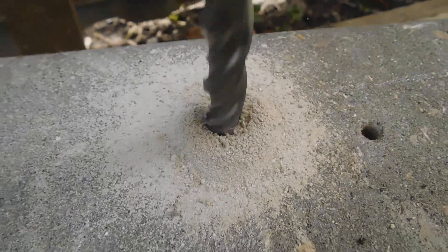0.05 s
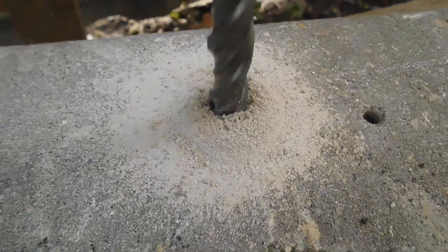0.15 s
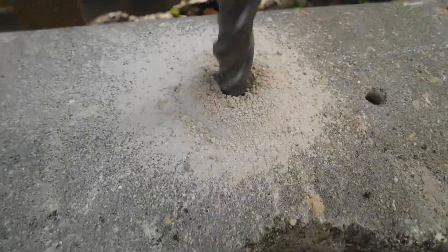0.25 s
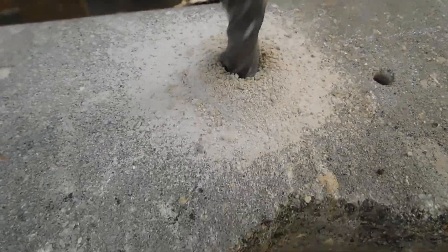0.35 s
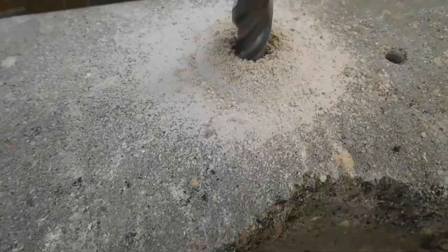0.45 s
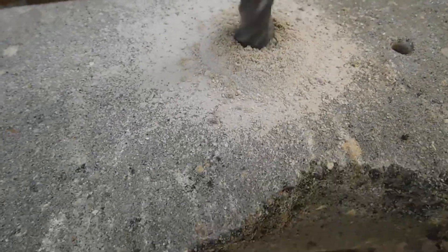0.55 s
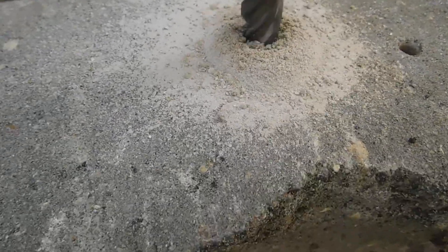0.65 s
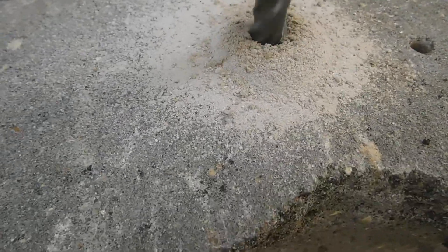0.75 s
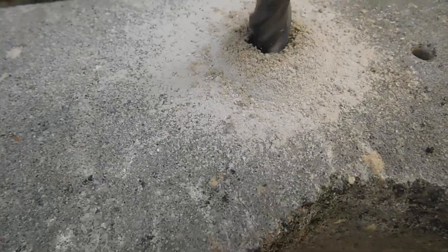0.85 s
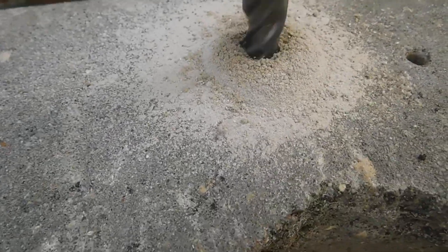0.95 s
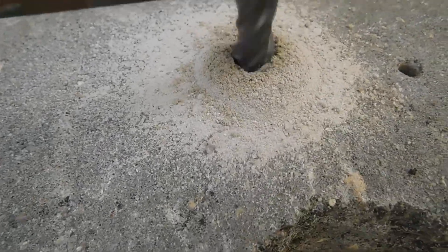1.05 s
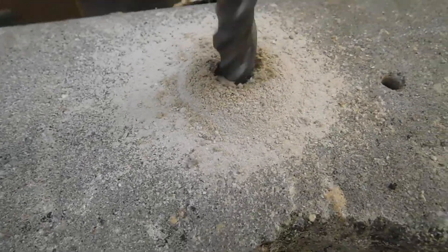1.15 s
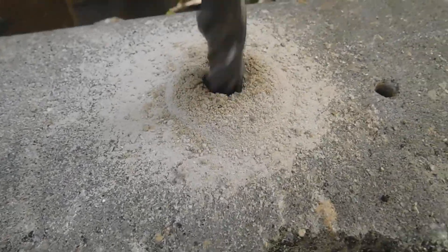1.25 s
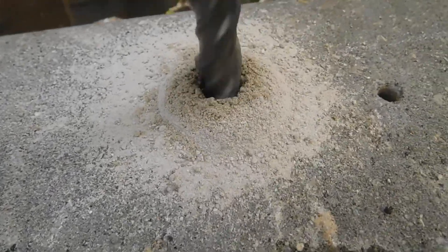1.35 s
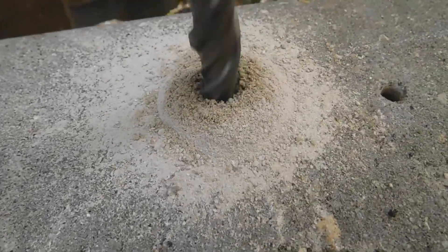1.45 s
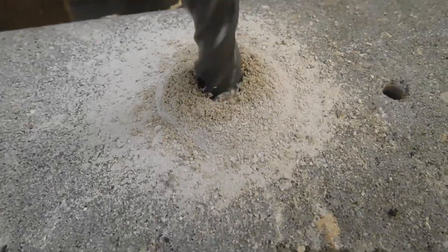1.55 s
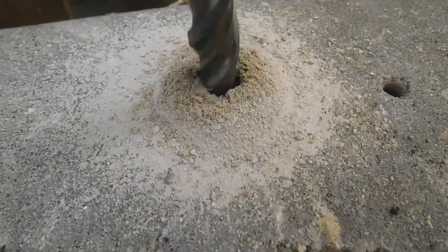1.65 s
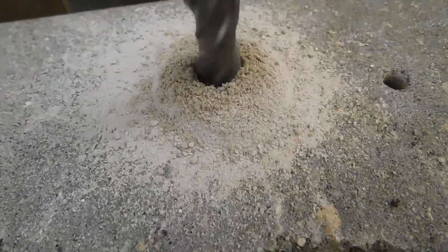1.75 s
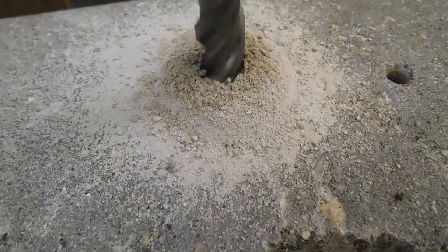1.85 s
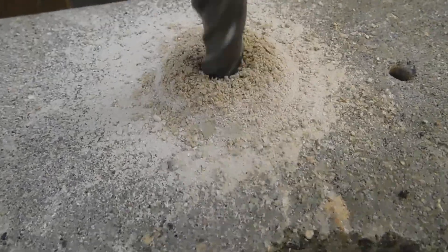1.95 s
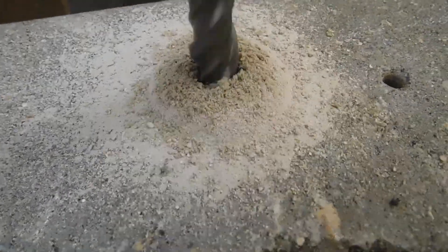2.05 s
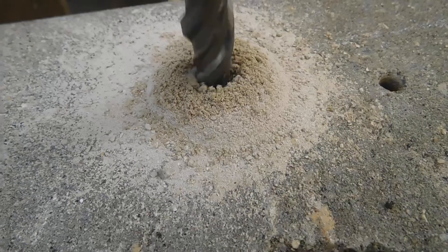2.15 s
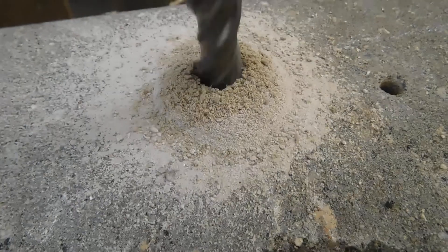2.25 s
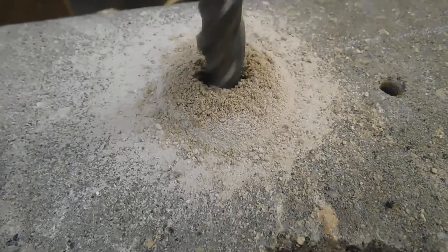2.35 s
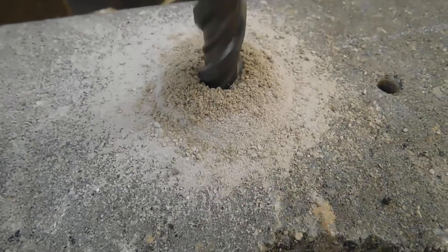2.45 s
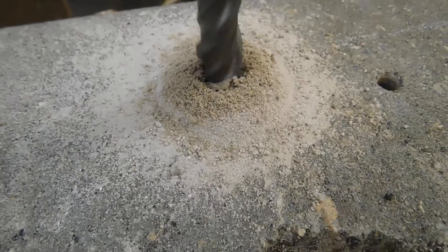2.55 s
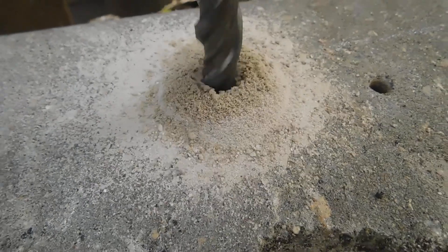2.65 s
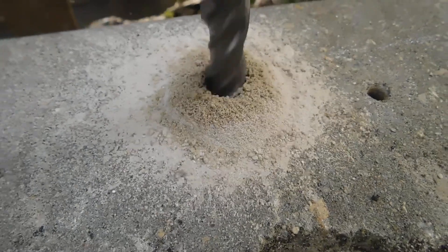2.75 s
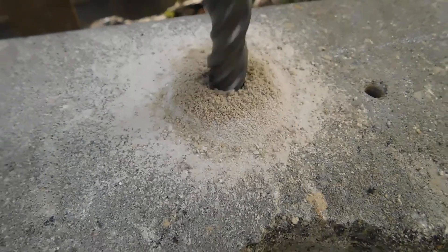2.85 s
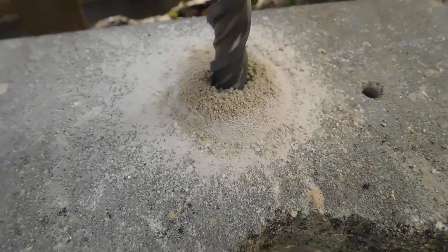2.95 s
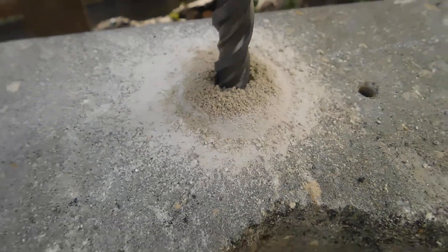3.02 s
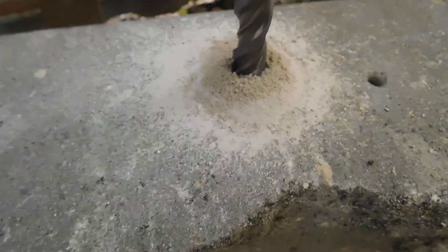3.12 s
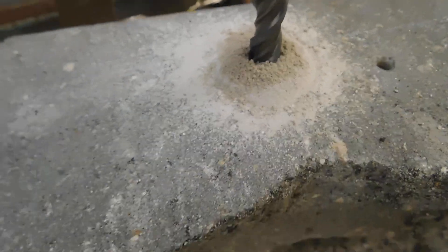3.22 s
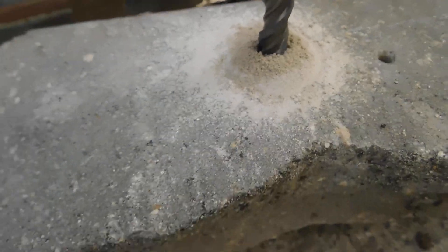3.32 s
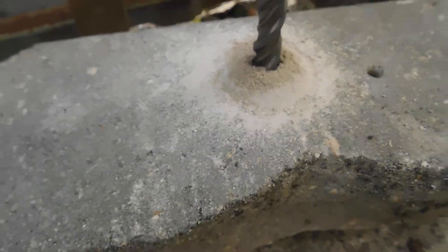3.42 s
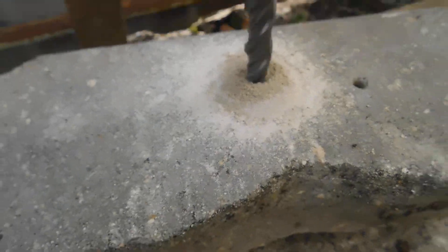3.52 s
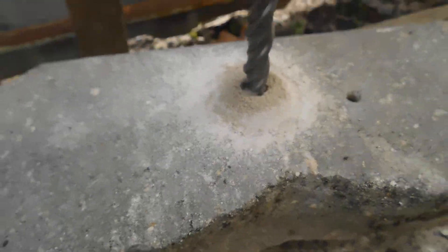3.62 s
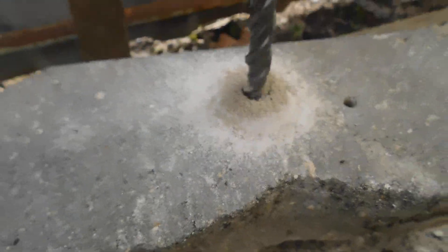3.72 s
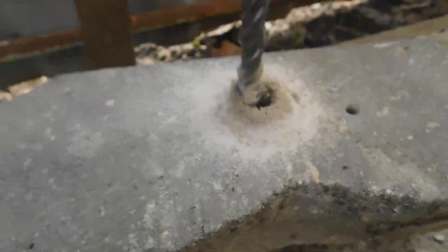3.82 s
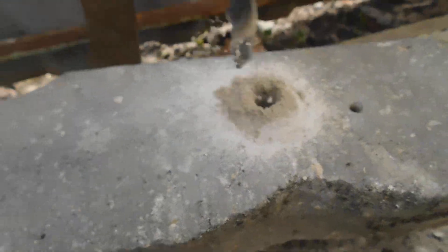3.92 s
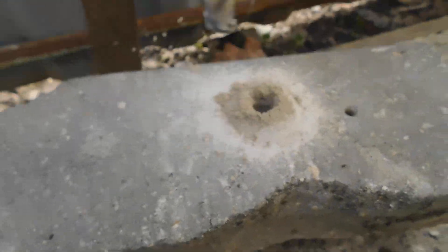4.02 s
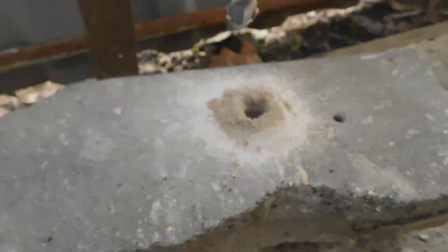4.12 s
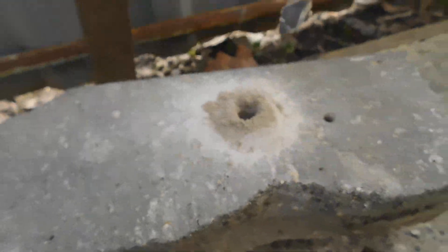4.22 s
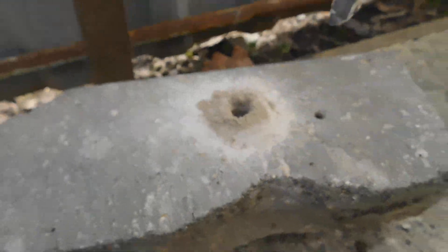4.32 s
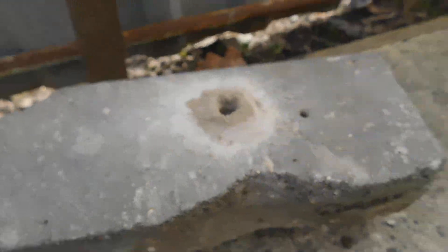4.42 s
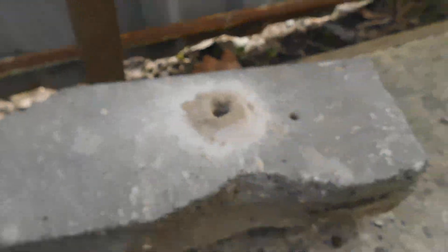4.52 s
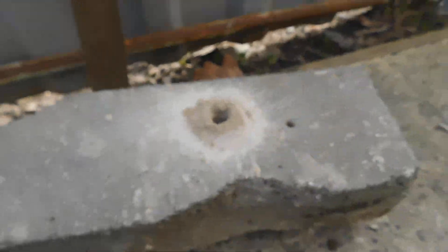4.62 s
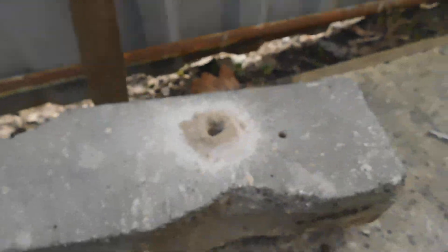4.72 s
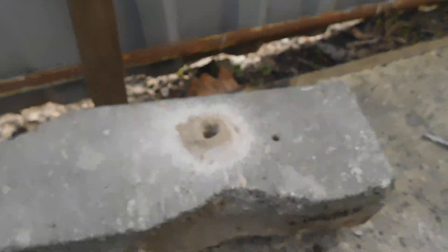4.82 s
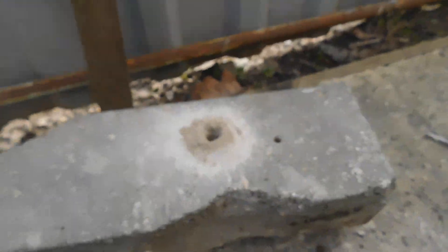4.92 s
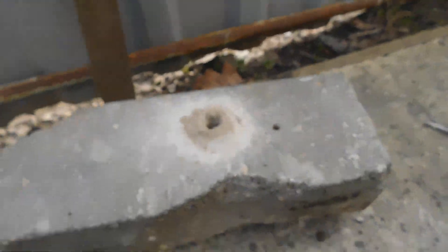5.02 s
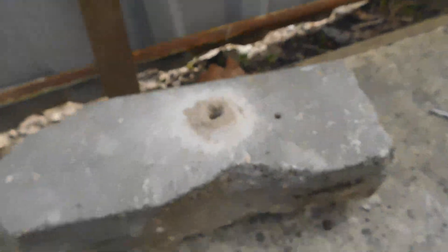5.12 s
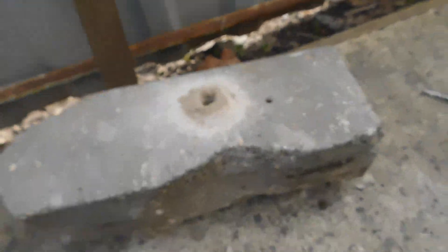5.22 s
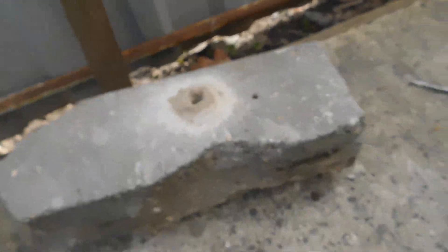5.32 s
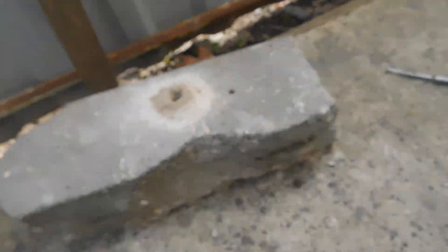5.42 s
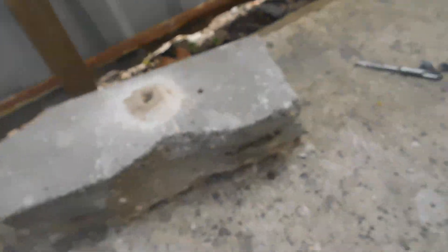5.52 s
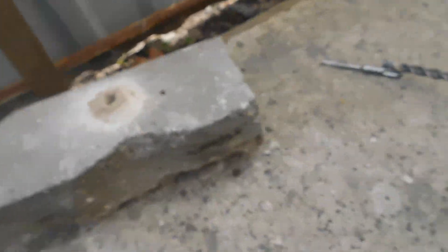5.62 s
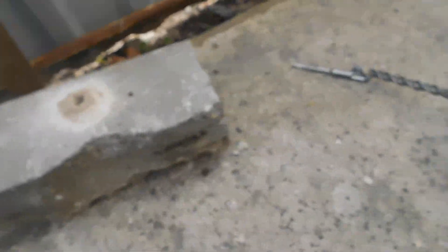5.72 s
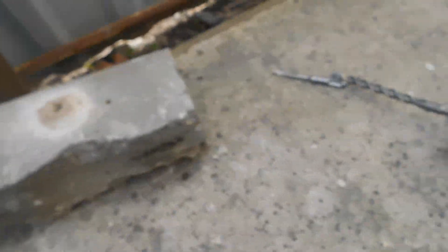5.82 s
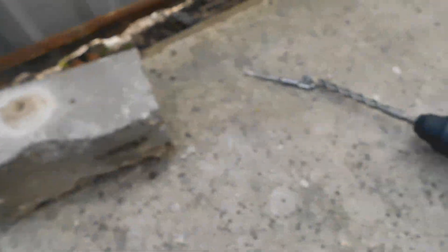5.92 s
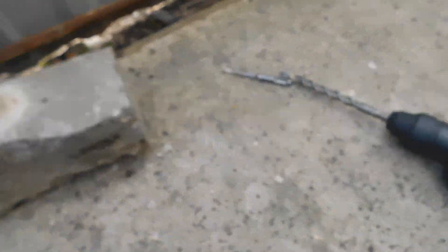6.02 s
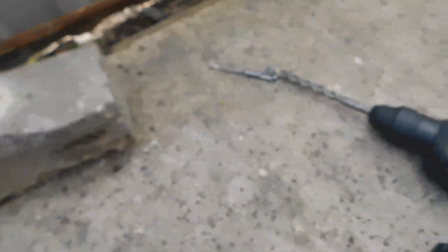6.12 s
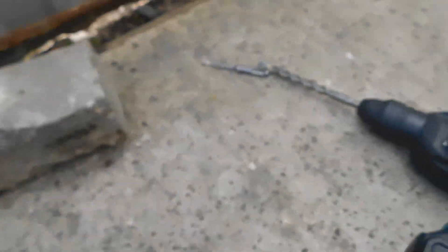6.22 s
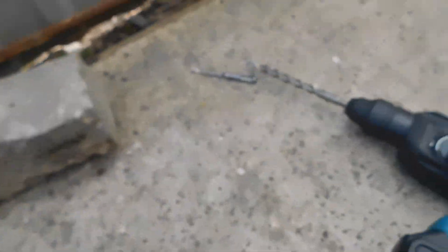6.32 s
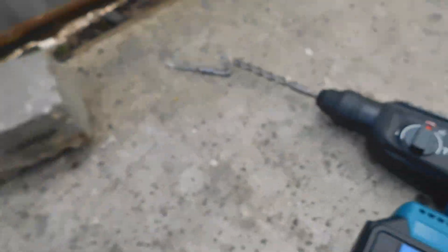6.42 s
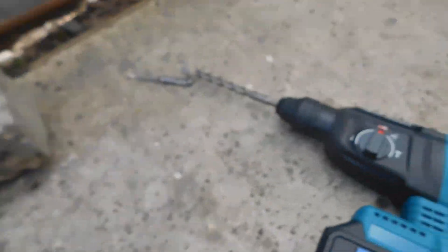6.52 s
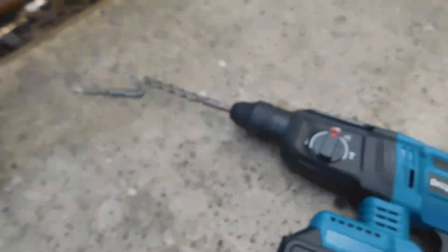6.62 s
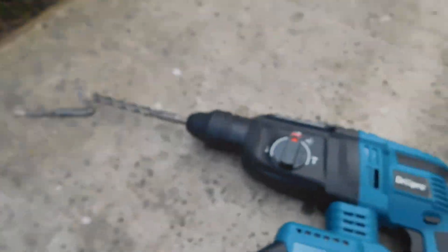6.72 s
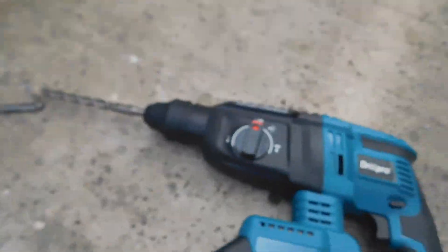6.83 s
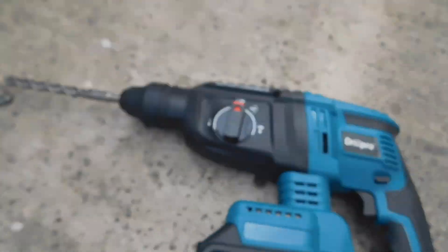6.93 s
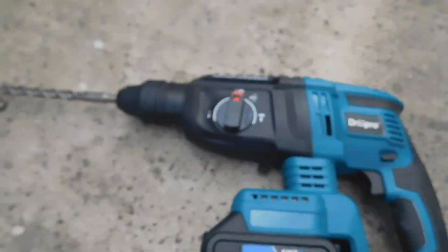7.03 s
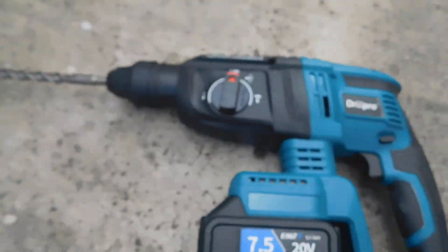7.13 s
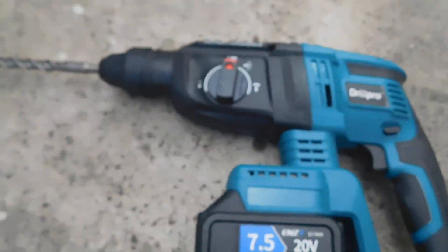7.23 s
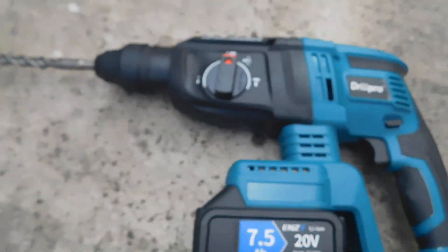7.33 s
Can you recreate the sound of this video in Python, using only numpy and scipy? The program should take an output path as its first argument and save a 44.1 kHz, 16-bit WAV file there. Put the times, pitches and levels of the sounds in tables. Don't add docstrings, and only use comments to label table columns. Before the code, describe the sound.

From 0 s a rotary hammer is already boring into concrete, very close and loud: a steady whine near 1.8 kHz, blows so rapid they blur into a buzzing chatter, and broad gritty rasp, all fuzzy from microphone overload. Around 2.7 s the pitch sags, and at about 2.95 s it cuts off with a short echo and a dull knock. A quiet gap follows. At 3.4 s a cluster of sharp metal clacks launches a free spin whose whine climbs quickly and stops at 3.7 s. Another clack at 3.83 s starts a second, lower whirr ending near 4.1 s. Then a quiet walled yard with faint distant murmur. From 4.9 s there are irregular knocks, a hard one with a brief steel ring at 5.2 s, the strongest thud at 5.6 s, a faint squeak at 5.8 s, a clatter around 6.1 s, and light taps with rustling movement until 7.3 s.

```python
import sys
import numpy as np
from scipy import signal
from scipy.fft import rfft, irfft
from scipy.io import wavfile
from scipy.ndimage import uniform_filter1d

SR = 44100
rng = np.random.default_rng(int(sys.argv[2]) if len(sys.argv) > 2 else 0)


def transcribe(u):
    v = np.clip(np.atleast_2d(u).T, -1, 1)
    q = np.round(v * 32767).astype(np.int16)
    wavfile.write(sys.argv[1], SR, q)


def magnitude_from_level(level_db):
    exponent = np.asarray(level_db, float) / 20
    return 10 ** exponent


N = 325008
GEAR_TEETH = 33

# (start [s], release [s], coast ends and brake bites if free [s], level [dB], left minus right
# [dB])
PULLS = [
    (-.1, 2.93, 2.985, -13.6, 0.1),
    (3.433, 3.712, 3.73, -13, -3.5),
    (3.845, 4.097, 4.131, -14, -5.5),
]
# (time [s], gear mesh [Hz])
MESH_SPEEDS = [
    [(0, 1788), (1.85, 1778), (2.72, 1778.5), (2.8, 1745), (2.87, 1590), (2.93, 1330), (3.0, 1100)],
    [(3.42, 1050), (3.5, 1870), (3.575, 2550), (3.6, 2620), (3.63, 2550), (3.67, 2380), (3.71, 2270),
     (3.79, 2300)],
    [(3.84, 1350), (3.865, 1620), (3.94, 2010), (3.98, 2075), (4.03, 2030), (4.1, 1930), (4.2, 1550)],
]
# (multiple of shaft turn, level [dB], wobble [dB])
LOADED_LINES = [(14, -26, 2), (22, -23, 2), (23, -26, 2), (26, -28, 2), (30, -25, 2), (31, -19.5, 1.5),
                (32, -21, 1.5), (33, -10, 1.2), (34, -13.5, 1.2), (35, -19.5, 1.5), (37, -22, 3),
                (39, -22, 3), (62, -22, 3), (63, -22, 3), (64, -17.5, 1.5), (65, -20, 3), (66, -14.5, 1.2),
                (67, -23, 3)]
# (multiple of shaft turn, level [dB], wobble [dB])
FREE_LINES = [
    [(16.5, -10.5, 4), (29.5, -18, 5), (32, -15, 4), (33, -7, 5), (38, -12, 5), (49.5, -8.5, 5),
     (66, -10, 5)],
    [(16.5, -20, 5), (32, -13, 4), (33, -6.5, 3), (34, -14, 4), (38, -17, 4), (50.5, -12, 4), (66, -16, 5),
     (73, -15, 6)],
]
# (frequency [Hz], density [dB per Hz])
RASP = [(15, -52), (25, -13), (384, -14.5), (1100, -10.5), (1230, -9.5), (1480, -12), (1790, -7),
        (2410, -11), (3250, -6.5), (3520, -6), (3820, -8), (5280, -13), (6210, -18.5), (12500, -21.7),
        (16000, -23.5)]
# (frequency [Hz], density [dB per Hz])
WHIRR = [(15, -46), (25, -8.5), (373, -13.5), (531, -12.5), (591, -15.5), (1190, -6.5), (1560, -7),
         (2000, -4.5), (2760, -8), (3340, -3), (5880, -15.5), (11600, -20.5), (16000, -23.5)]
# (frequency [Hz], likeness [0-1])
ALIKE = [(200, 0), (640, 0.72), (1400, 0.75), (3100, 0.42), (6000, 0.25), (15000, 0)]
# (frequency [Hz], left minus right [dB])
TILT = [(200, 1), (700, -5), (2400, -8), (4400, 6), (8000, -3.5), (15000, -1)]
# (frequency [Hz], width [Hz], level [dB])
BIT = [(2107, 247, -10.5), (3500, 230, -14.5), (5200, 550, -12.5), (7600, 790, -18), (12300, 210, -18.5)]
# (frequency [Hz], gain [dB])
HOUSING = [(600, -4), (900, -1), (1250, -1.5), (1500, -4), (2000, 1.5), (2300, 1.5), (2600, 2.5),
           (2900, -2), (3300, 3.5), (3900, -2), (4600, -5), (5300, -9)]
# (time [s], peak [dB])
CLACKS = [(3.4098, -6), (3.4125, -1), (3.4160, -3), (3.4186, -4), (3.4235, -3), (3.4288, -5), (3.820, -19),
          (3.8290, 3.5), (3.8311, -3.5), (3.8350, -4), (3.8363, -3), (4.128, -5)]
# (frequency [Hz], level [dB], t60 [s])
CLUTCH_MODES = [(2373, 2, 0.024), (2940, 6, 0.017), (3770, 1, 0.018), (4200, -2, .014), (1180, -9, 0.022),
                (8160, -18, .012)]
# (time [s], peak [dB], centre [Hz], treble [dB])
KNOCKS = [(3.015, -21, 1590, -35), (3.319, -41, 1020, -14), (4.351, -45, 573, -17.5),
          (4.914, -28, 1800, -1), (5.063, -42, 2480, -28), (5.196, -14, 2860, -6),
          (5.205, -25.5, 1170, -37), (5.327, -35, 1000, -5), (5.576, -34, 1250, -8), (5.617, -8, 1500, -8),
          (5.721, -30.5, 1560, -26), (5.768, -44, 1070, -22), (6.045, -28, 1300, -20),
          (6.068, -19.5, 2660, -28), (6.072, -24, 825, -24), (6.102, -21.5, 2200, -13),
          (6.169, -23, 2700, -17), (6.196, -27, 2900, -7), (6.387, -39, 1450, 3), (6.414, -42, 1085, -7),
          (6.474, -36.5, 1390, 6), (6.629, -35, 340, -12), (6.66, -28, 1380, -10), (6.973, -27, 2120, -12),
          (6.996, -33, 2190, 2), (7.031, -35.5, 3950, -13), (7.165, -32, 3800, -10), (7.199, -43, 1460, -8),
          (7.226, -39, 2820, -14), (7.269, -30.5, 5100, -4)]
# (time [s], left minus right [dB])
KNOCK_SIDE = [(3.0, -12), (5.2, -10), (6.2, -9), (6.7, -3), (6.95, 3), (7.3, 2)]
# (frequency [Hz], level [dB], t60 [s])
BIT_DROP = (5.1945, -27.5, [(5000, 5, 0.028), (8340, -3, 0.049), (12200, -9, 0.096)])
# (frequency [Hz], level [dB], t60 [s])
SQUEAK = (5.8, -56, [(6800, .1, .3), (1050, 2.5, .25), (1650, .1, .2)])
# (frequency [Hz], density [dB per Hz])
YARD = [(25, -14), (50, -7.5), (120, -7.5), (250, -7.5), (400, -3), (630, 2.5), (1000, 1.5), (1600, 0.5),
        (2500, -3), (4000, -8.5), (6300, -15.5), (10000, -21), (16000, -25)]

COAST_DB_PER_S, BRAKE_DB_PER_S, BRAKE_DEPTH_DB, IDLE_DB_PER_S = 330, 700, 13, 190
SWING_IN_DB, SWING_IN_S, SWING_OUT_DB = -7, 0.074, -5.5
FUZZ_FROM_DB, FUZZ_SLOPE, FUZZ_MOST_DB = -15, 0.9, -11
KNOCK_T60_S, HARD_T60_S_PER_DB = 0.043, -.0006
BOOM_DB, BOOM_DB_PER_OCTAVE = -6, -9
TICK_HZ, TICK_HZ_PER_DB = 6500, -90
YARD_DB, MURMUR_DB, RUSTLE_DB, YARD_PAN_DB = -51.5, -1.5, -1.5, -3.5
MOVING_S, MOVING_RISE_S, MOVING_DB = 4.67, .8, 3


def level(x, db):
    return x * magnitude_from_level(db) / np.sqrt(np.mean(x ** 2))


def on_log(table, hz):
    points_hz, values = np.transpose(table)
    return np.interp(np.log(hz + 1), np.log(points_hz), values)


def colour(x, table):
    size = x.shape[-1]
    return irfft(rfft(x) * magnitude_from_level(on_log(table, np.fft.rfftfreq(size, 1 / SR))), size)


def pair(spectrum, alike, tilt):
    hz = np.fft.rfftfreq(N, 1 / SR)
    share = np.clip(on_log(alike, hz), 0, 1)
    sign = np.array([[1], [-1]])
    mid, side = rfft(rng.standard_normal((2, N)))
    both = np.sqrt(1 + share) * mid + sign * np.sqrt(1 - share) * side
    gain_db = on_log(spectrum, hz) + sign * on_log(tilt, hz) / 2
    return level(irfft(both * magnitude_from_level(gain_db), N), 0)


def walk(rate_hz):
    k = int(SR / rate_hz)
    held = np.repeat(rng.standard_normal(N // k + 1), k)
    return 0.9 * uniform_filter1d(uniform_filter1d(held, k), k)[:N]


def resonate(x, hz, width_hz):
    return signal.lfilter(*signal.iirpeak(hz, hz / width_hz, SR), x)


def fade(t60_s, size=8192):
    return np.exp(-np.log(1000) * np.arange(size) / SR / max(t60_s, .004))


def ring(modes):
    t = np.arange(8192) / SR
    out = np.zeros(8192)
    for hz, db, t60_s in modes:
        out += magnitude_from_level(db + 1.4 * rng.standard_normal()) * np.sin(2 * np.pi * hz * t) * fade(t60_s)
    return out


def add(out, s, sound, peak_db, pan_db):
    i, lag = int(s * SR), int(round(-.9 * pan_db))
    piece = sound[:N - i - 16] * magnitude_from_level(peak_db) / np.abs(sound).max()
    out[0, i + lag:i + lag + len(piece)] += piece * magnitude_from_level(pan_db / 2)
    out[1, i:i + len(piece)] += piece * magnitude_from_level(-pan_db / 2)


def hammer(turns):
    blows = np.zeros(N)
    at = np.flatnonzero(np.diff(np.floor(turns)))
    blows[at] = magnitude_from_level(4.1 * rng.standard_normal(len(at)))
    rattle = colour(rng.standard_normal((2, 2048)) * fade(0.12, size=2048), RASP)
    rattle = colour(rattle, [(250, -9), (700, 0.5), (1500, -0.2), (5000, -9)])
    block = signal.fftconvolve(blows[None], rattle, axes=1)[:, :N]
    chatter = 1 + 0.16 * np.cos(2 * np.pi * turns) + 0.1 * np.cos(4 * np.pi * turns)
    steel = np.zeros((2, N))
    for hz, width_hz, db in BIT:
        steel += level(resonate(pair([(1, 0)], ALIKE, TILT), hz, width_hz), db)
    grit = level(pair(RASP, ALIKE, TILT), -0.86) * magnitude_from_level(0.94 * walk(14) + 1.6 * walk(300))
    return level(block, -8.5) + chatter * (steel + grit)


def gear(turns, lines, stray_rad, live):
    out = np.zeros((2, N))
    port_rad = 0.16 * np.array([[1], [-1]]) * (1 + 0.53 * walk(9.6))
    for order, db, wobble_db in lines:
        phase = 2 * np.pi * order * turns + stray_rad * walk(45)
        phase += 2 * np.pi * rng.random() * (order > 1.5 * GEAR_TEETH)
        swell = magnitude_from_level(db + wobble_db * walk(40)[live])
        out[:, live] += swell * np.sqrt(2) * np.sin(phase[live] + port_rad[:, live])
    return out


def drilling(turns, mesh_hz, live):
    slack = np.clip(1 - mesh_hz / 1775, 0, 1)
    return hammer(turns) + gear(turns, LOADED_LINES, .1 + 9 * slack, live) * magnitude_from_level(-18 * slack)


def free_spin(turns, lines, live):
    whirr = level(pair(WHIRR, ALIKE, TILT), -0.97)
    whirr = whirr * (1 + 0.15 * np.cos(2 * np.pi * turns)) * magnitude_from_level(2.2 * walk(220))
    return whirr + magnitude_from_level(-3.0) * colour(gear(turns, lines, 1.9, live), HOUSING)


def pull(row, speed, lines, loaded):
    start_s, release_s, brake_s, hold_db, side_db = row
    t = np.arange(N) / SR
    coast_s = np.clip(t, release_s, brake_s) - release_s
    braking_s = np.maximum(t - brake_s, 0)
    brake_db = np.minimum(BRAKE_DB_PER_S * braking_s, BRAKE_DEPTH_DB * (not loaded))
    db = hold_db - COAST_DB_PER_S * coast_s - brake_db - IDLE_DB_PER_S * braking_s
    pan_db = side_db + SWING_IN_DB * np.exp(-np.abs(t - start_s) / SWING_IN_S)
    pan_db = pan_db + SWING_OUT_DB * coast_s / (brake_s - release_s)
    mesh_hz = np.interp(t, *np.transpose(speed))
    turns = np.cumsum(mesh_hz) / (GEAR_TEETH * SR)
    live = (t >= start_s) & (db > -90)
    body = drilling(turns, mesh_hz, live) if loaded else free_spin(turns, lines, live)
    core = resonate(body, 1400, 2600)
    fuzz_db = np.clip(FUZZ_SLOPE * (db - FUZZ_FROM_DB), FUZZ_MOST_DB, 0)
    body = core + (body - core) * magnitude_from_level(fuzz_db)
    running = uniform_filter1d(1. * (t >= start_s), size=120, mode="nearest")
    true_db = db + 3.3 * np.clip((db + 21.0) / 10, 0, 1)
    left, right = running * body * magnitude_from_level(true_db + 1.3 * np.array([pan_db, -pan_db]) / 2)
    return np.array([np.roll(left, 2), right])


def clutch(out):
    for s, db in CLACKS:
        crunch = resonate(rng.standard_normal(8192) * fade(0.016), 2800, 8000)
        add(out, s, ring(CLUTCH_MODES) + 1.8 * crunch, db, pan_db=-3.5)


def knock(db, hz, treble_db):
    noise = rng.standard_normal((3, 8192))
    t60_s = KNOCK_T60_S + HARD_T60_S_PER_DB * (db + 44)
    contact = fade(t60_s) + 0.8 * fade(0.008)
    thud = resonate(resonate(noise[0] * contact, hz, 1.3 * hz), hz, 1.6 * hz)
    boom = resonate(resonate(noise[1] * fade(0.91 * t60_s), 460, 360), 520, 450)
    boom_db = min(BOOM_DB + BOOM_DB_PER_OCTAVE * np.log2(hz / 1000), -7)
    tick_hz = TICK_HZ + TICK_HZ_PER_DB * (db + 40)
    tick = resonate(resonate(noise[2] * contact, tick_hz, 1.1 * tick_hz), tick_hz, 1.5 * tick_hz)
    return level(thud, 0) + level(boom, boom_db) + level(tick, treble_db + 1)


def handling():
    out = np.zeros((2, N))
    clutch(out)
    for s, db, hz, treble_db in KNOCKS:
        add(out, s, knock(db, hz, treble_db), db, np.interp(s, *np.transpose(KNOCK_SIDE)))
    for s, db, modes in (BIT_DROP, SQUEAK):
        add(out, s, ring(modes), db, pan_db=-7.0)
    return out


def walls(x, t60_s, db):
    size = 16384
    tail = colour(rng.standard_normal((2, size)), [(150, -19), (700, 1.5), (3000, -3.0), (6000, 5), (10000, -20)])
    tail = tail * fade(t60_s, size)
    tail = tail - colour(tail, [(2500, -30), (6000, -2.5)]) * (1 - fade(0.35 * t60_s, size))
    tail = tail / np.sqrt(np.sum(tail ** 2) / 2)
    return magnitude_from_level(db) * signal.fftconvolve(x.mean(0)[None], tail, axes=1)[:, :N]


def yard():
    moving = np.clip((np.arange(N) / SR - MOVING_S) / MOVING_RISE_S, 0, 1)
    hum = level(pair(YARD, [(60, 0.74), (640, 0.18), (2500, .01)], [(1, 0)]), YARD_DB)
    bass = signal.filtfilt(*signal.butter(2, 300, fs=SR), hum)
    below = signal.filtfilt(*signal.butter(2, 3500, fs=SR), hum)
    murmur = (below - bass) * magnitude_from_level(MURMUR_DB + 1.5 * walk(10) + 0.92 * walk(2.76))
    rustle = (hum - below) * magnitude_from_level(RUSTLE_DB + MOVING_DB * moving + 0.78 * walk(30) + 1.6 * walk(6))
    return (bass + murmur + rustle) * magnitude_from_level(np.array([[YARD_PAN_DB], [-YARD_PAN_DB]]) / 2)


def scene():
    tool = np.zeros((2, N))
    for i, lines in enumerate([LOADED_LINES, *FREE_LINES]):
        tool += pull(PULLS[i], MESH_SPEEDS[i], lines, loaded=i == 0)
    knocks = handling()
    near_echo = walls(tool, 0.2, -19.5)
    far_echo = walls(resonate(resonate(tool, 800, 1100), 800, 1100), 0.65, -25)
    return tool + near_echo + far_echo + knocks + walls(knocks, 0.11, -8.5) + yard()


def low_pass(x):
    return signal.sosfilt(signal.butter(12, 16710, fs=SR, output="sos"), x)


def record(dry):
    ceiling, knee = np.array([[.5], [.6]]), 2.5
    bent = dry + 0.099 * dry ** 2
    flat = bent / (1 + np.abs(bent / ceiling) ** knee) ** (1 / knee)
    out = signal.sosfilt(signal.butter(1, 15, "high", fs=SR, output="sos"), flat)
    out = signal.sosfilt(signal.ellip(10, .2, 60, 15800, fs=SR, output="sos"), out)
    return low_pass(out)


dry = scene()
out = record(dry)
transcribe(out)
```